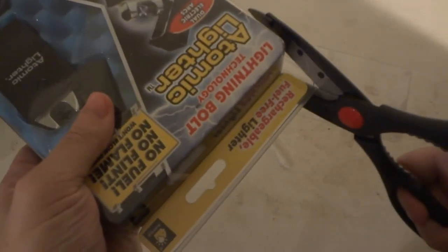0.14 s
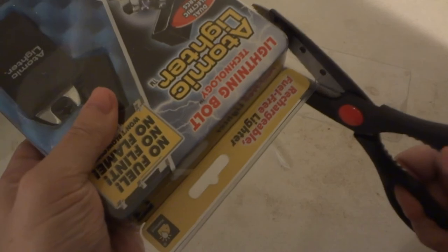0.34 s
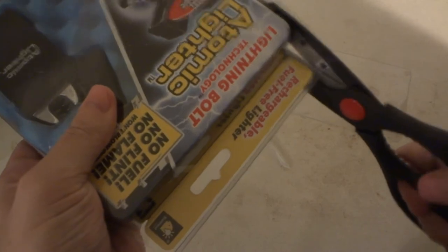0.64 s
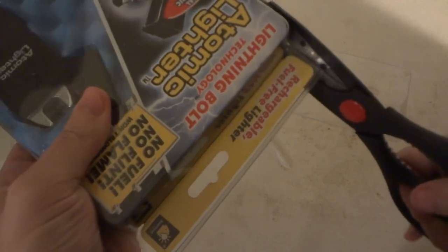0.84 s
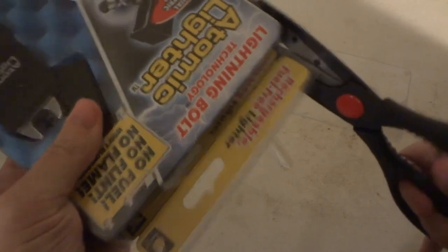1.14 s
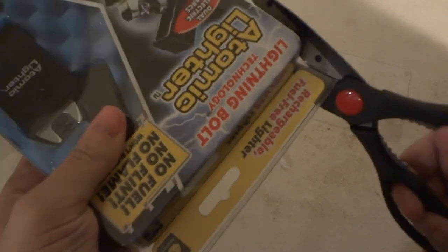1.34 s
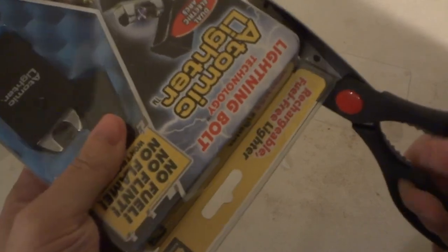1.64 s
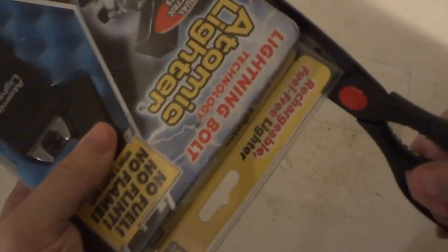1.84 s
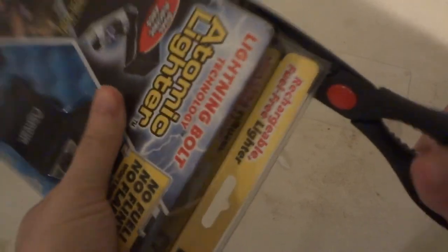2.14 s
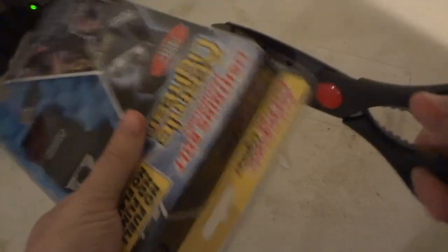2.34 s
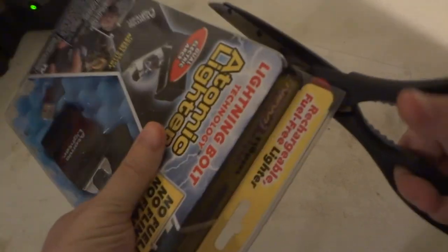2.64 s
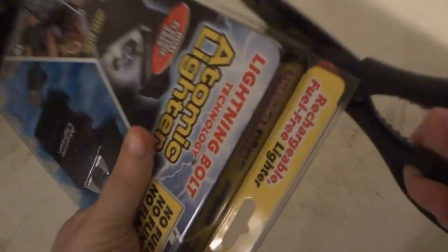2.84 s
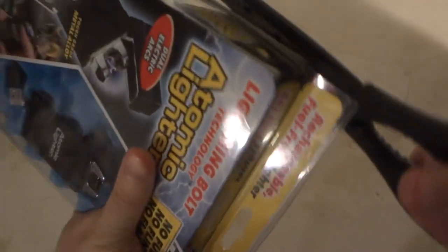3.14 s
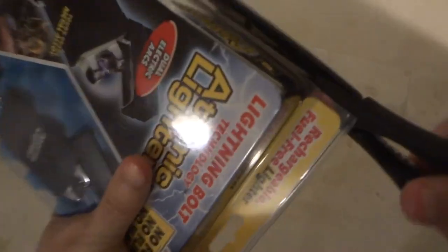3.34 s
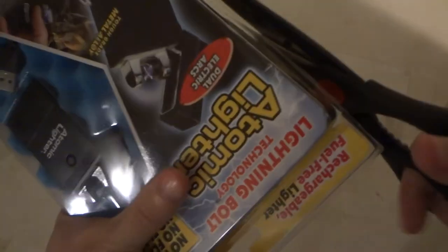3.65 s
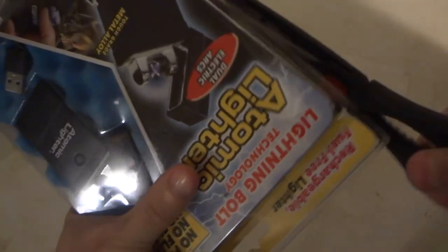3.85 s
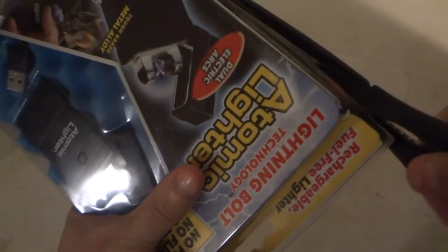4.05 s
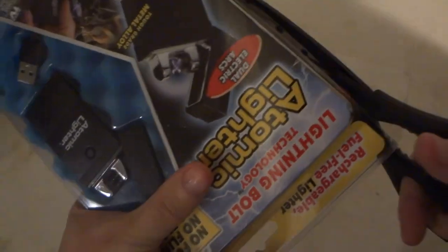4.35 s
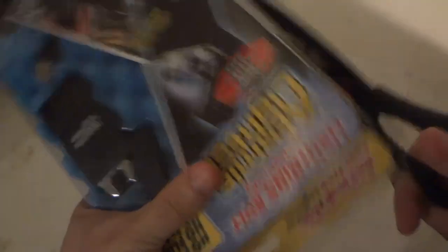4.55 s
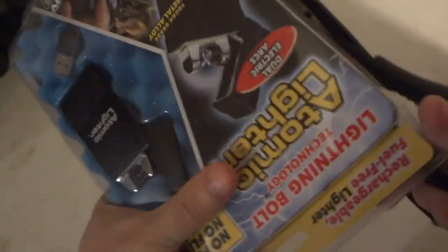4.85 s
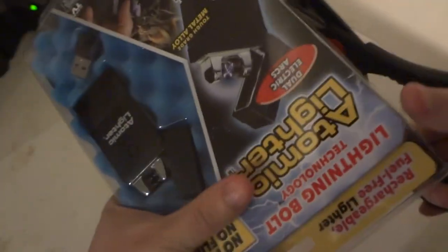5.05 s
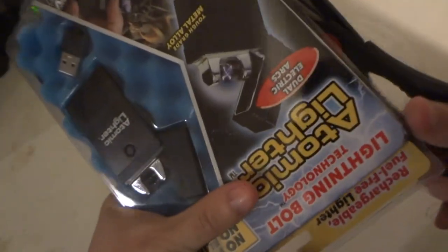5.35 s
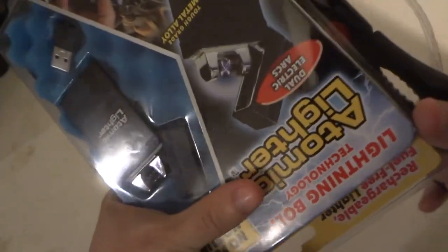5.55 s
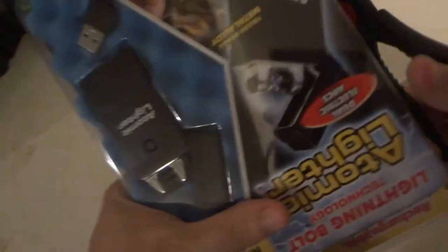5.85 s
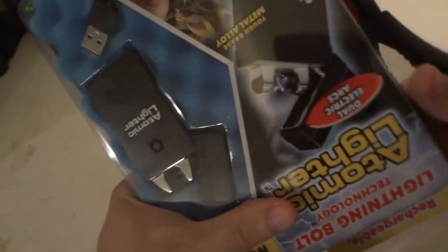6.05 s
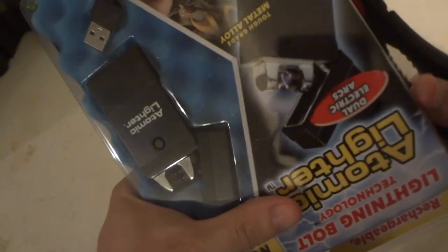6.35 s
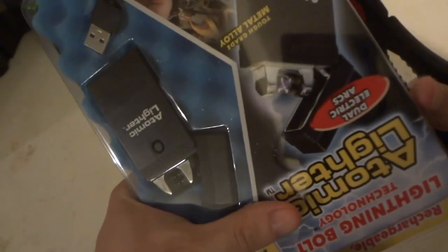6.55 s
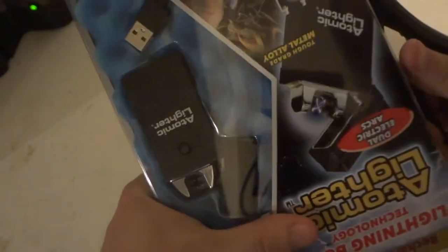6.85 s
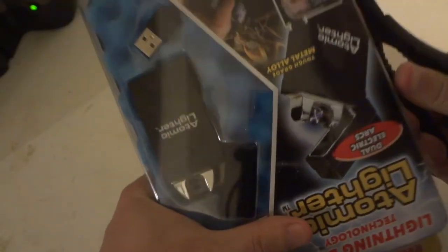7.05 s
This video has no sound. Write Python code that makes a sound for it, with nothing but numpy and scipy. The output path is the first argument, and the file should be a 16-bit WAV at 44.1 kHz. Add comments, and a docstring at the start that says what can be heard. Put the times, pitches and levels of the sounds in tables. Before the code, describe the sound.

Hard plastic shell creaks, pops and cracks as scissor blades bite through it in uneven bursts, growing busier, over faint indoor hiss.

```python
"""Scissors work on a stiff plastic blister pack over a desk, close to a camera in a small, softly hissing room.
First the shell snaps (a push on its hollow body, then creasing faces), the hand jolts it with dull thuds
and the edge ticks (noise bursts about a millisecond long); the first short strokes follow.
The steel blades then slide and knock (slips ringing metal modes), before the busiest cutting: stick-slip
strokes rasp at the edge and shake faces and shell, among more snaps, ticks and small ringing pops."""
import sys
import numpy as np
from scipy import signal
from scipy.fft import rfft, irfft
from scipy.io import wavfile
from scipy.ndimage import uniform_filter1d

SR = 44100
rng = np.random.default_rng(int(sys.argv[2]) if len(sys.argv) > 2 else 0)


def put_to_file(sound):
    """Save the sound as 16-bit audio at rate SR, in the file named by the first command-line argument."""
    columns = np.atleast_2d(sound).T  # one column per channel
    safe = np.clip(columns, -1, 1)
    whole_steps = np.round(safe * 32767)
    wavfile.write(sys.argv[1], SR, whole_steps.astype(np.int16))


N = 317079
TIME = np.arange(N) / SR
HIT = TIME[:SR // 6]  # time within one blow

# Blade strokes through the sheet: start_s, push_s, release_s, swell_db (negative sinks), rasp_db,
# faces_db, patch_hz, edge_hz, shell_db (hollow shell relative to the faces)
STROKES = [(1.143,0.056,0.12,20,-42,-46.5,870,4700,-5), (1.532,0.0051,0.11,2,-41,-80,820,5370,-10),
           (2.974,0.016,0.079,3,-53,-42.5,1130,5400,-17), (3.813,0.055,0.027,9.5,-37,-41.5,905,5400,-1),
           (3.904,0.016,0.045,10,-53.5,-34.5,920,3300,-18), (4.12,0.12,.25,-4.5,-68,-61,960,5000,5.5),
           (4.373,0.051,0.045,1.5,-31.5,-31,920,2920,-15.5), (4.542,0.021,0.084,0.5,-28,-37,1100,8900,-4.5),
           (4.575,0.018,0.059,-2,-28.5,-41.5,1220,6000,-2), (4.622,0.0096,0.17,9,-34,-28.5,1360,3000,-11),
           (4.666,0.03,0.061,30,-23,-34,900,5660,-12), (4.775,0.19,.05,0.5,-52.5,-65,833,7560,-3),
           (4.882,0.04,0.062,10,-31.5,-31.5,750,7600,-5), (5.179,0.034,0.18,15,-52,-60,1020,6950,-11),
           (5.360,0.0071,0.089,31,-34.5,-38.5,1210,6060,-4), (5.689,0.0093,0.068,6,-28,-30.5,1180,7200,-9),
           (5.730,0.049,0.21,15,-29,-27,990,8050,-7.5), (6.369,0.0019,0.05,2,-40,-24.5,1020,5000,-15),
           (6.580,0.085,0.19,25,-28.5,-28.5,880,5300,-8.5), (6.705,0.051,0.14,13,-52.5,-55,860,6100,4),
           (6.975,0.0027,0.15,-7,-47,-41.5,1040,8600,-4)]
# Modes of the air-filled shell: pitch_hz, level_db, t60_s
SHELL_MODES = [(275,-5.5,.048),(325,-3.5,.045),(383,0,.09),(462,0,.05),(560,-9,.04)]
# Modes of the flat faces of the pack: pitch_hz, level_db, t60_s
FACE_MODES = [(720,2,.022),(810,5.5,.028),(905,4,.032),(1045,1,.024),(1160,1,.026),(1240,0,.032),(1440,1.5,.013),(1680,0,.012),(2300,-1.5,.013)]


def undb(db):
    """Decibels to gain."""
    return 10 ** (np.asarray(db) / 20)


def unit(x):
    """Scale to rms 1."""
    return x / np.sqrt(np.mean(x ** 2))


def struck(x, db):
    """Set the rms level of the first 20 ms of a blow."""
    return x * undb(db) / np.sqrt(np.mean(x[:SR // 50] ** 2))


def add(track, s, x):
    """Mix x into the track at s seconds."""
    i = max(int(s * SR), 0)
    track[i:i + len(x)] += x[:N - i]


def through(x, response):
    """Pass a force through an impulse response."""
    return signal.fftconvolve(x, response)[:len(x)]


def colour(x, points):
    """Shape by a spectrum of (Hz, dB) points."""
    hz, db = np.transpose(points)
    f = np.fft.rfftfreq(len(x), 1 / SR)
    gain = undb(np.interp(np.log(f + 1), np.log(hz), db))
    return irfft(rfft(x) * gain, len(x))


def band(x, hz):
    """A broad resonance, an octave wide."""
    edges = np.minimum([hz / np.sqrt(2), hz * np.sqrt(2)], SR / 2 - 1)
    return signal.sosfilt(signal.butter(1, edges, "bandpass", fs=SR, output="sos"), x)


def thin(x, hz, order):
    """A small thin sheet radiates little below hz."""
    return signal.sosfilt(signal.butter(order, hz, "highpass", fs=SR, output="sos"), x)


def steady(x, span_s):
    """Even out the slow swings of a grain stream, keeping its grain."""
    power = uniform_filter1d(x ** 2, int(span_s * SR))
    return x / np.sqrt(np.maximum(power, 0) + 1e-12)


def ring(modes, scatter_db):
    """Damped modes; their weights scatter in dB with the point of contact."""
    hz, db, t60 = np.transpose(modes)[:, :, None]
    size = undb(db + scatter_db * rng.standard_normal(db.shape))
    decay = np.exp(-np.log(1000) * HIT / t60)
    return np.sum(size * np.sin(2 * np.pi * hz * HIT) * decay, axis=0)


def flexed(modes):
    """Bending the pack retunes each of its modes a little."""
    hz, db, t60 = np.transpose(modes)
    detune = 1 + .012 * rng.standard_normal(len(hz))
    return np.transpose([hz * detune, db, t60])


def slips(count, rate, spread_db):
    """Impulses at random moments, rate per second; a few stand out louder (softer for a negative spread)."""
    size = undb(spread_db * np.minimum(rng.exponential(size=count), np.pi))
    return (rng.random(count) < rate / SR) * size * rng.choice([-1, 1], count)


def tears(count, rate, spread_db):
    """Low, middle and high cracks of torn plastic, each register at its own random moments."""
    # Colour of rubbed and torn plastic: pitch_hz, level_db
    torn_colour = [(500,-45),(1200,9.5),(2000,1.5),(2700,0),(3500,4.5),(5300,2.5),(7000,0),(10500,1.5),(13000,10.5)]
    cracks = sum(band(slips(count, rate, spread_db), hz) for hz in (2600, 5200, 9500))
    return colour(cracks, torn_colour)


def pressure(t, push_s, release_s, swell_db):
    """The blade catches, changes by swell_db to full pressure over the push, then falls 60 dB in release_s."""
    attack_s, swell_power = 0.00017, 2.23  # the swell moves quickly, then levels off
    to_go = np.clip(1 - t / push_s, 0, 1)
    swell = undb(-swell_db * to_go ** swell_power)
    release = np.exp(-np.log(1000) * np.maximum(t - push_s, 0) / release_s)
    return (1 - np.exp(-t / attack_s)) * swell * release


def judder(t):
    """The blade sticks and slips: quick random swings of grip."""
    swings_per_s, depth_db = 166.3, 1.67
    swings = rng.standard_normal(256)
    return undb(depth_db * np.interp(t * swings_per_s, np.arange(len(swings)), swings))


def air():
    """Soft room rumble, alike on both sides, under a wider hiss."""
    # Spectrum of the still room: pitch_hz, density_db (relative, per Hz)
    air_spectrum = [(15, -35), (25, -18), (87, -1), (207, -7), (311, 3), (344, 3), (603, 0), (721, -5.5),
                    (907, -1.5), (1470, -5), (2510, -9), (4750, -12.5), (5820, -10.5), (6280, -13.5),
                    (11000, -15.5), (14300, -55), (22000, -120)]
    level_db = -61  # rms of the part alike on both sides
    mid, side = (colour(rng.standard_normal(N), air_spectrum) for _ in range(2))
    side = colour(side, [(60, -15.0), (400, -2.5), (1500, 3.5), (8000, -6.5)])
    return undb(level_db) * (mid + np.array([[1], [-1]]) * side) / np.std(mid)


def whistle():
    """Thin high tones flicker in the hiss, in short blips of uneven strength."""
    # Faint whistles: pitch_hz, level_db (highest possible peak)
    whistle_tones = [(5290,-64),(5750,-71),(6260,-66)]
    out = np.zeros(N)
    for hz, db in whistle_tones:
        cycle = TIME * 14.9 + rng.random()  # one blip per cycle, 14.9 a second
        strength = np.sqrt(rng.random(int(cycle[-1]) + 1))[cycle.astype(int)]
        blip = np.maximum(np.sin(2 * np.pi * cycle), 0) ** 2
        out += undb(db) * strength * blip * np.sin(2 * np.pi * hz * TIME)
    return out


def room(x):
    """The desk answers within milliseconds; the walls add a short tail, different on each side."""
    t = TIME[:SR // 2]
    desk = slips(len(t), rate=3000, spread_db=0) * (t > .002) * np.exp(-t / .005)
    desk = undb(-9.0) * desk / np.linalg.norm(desk)
    wall_colour = [(150, -14.0), (400, -17.0), (900, -8.0), (4000, -9.5), (11000, -12.5)]
    sides = []
    for _ in range(2):
        decay = (1 - np.exp(-t / 0.000058)) * np.exp(-np.log(1000) * t / 0.24)  # t60 0.24 s
        tail = rng.standard_normal(len(t)) * decay
        tail = colour(tail / np.linalg.norm(tail), wall_colour)
        sides.append(x + through(x, desk + tail))
    return np.array(sides)


def thuds():
    """The hand jolts the whole pack, which swings briefly on two low modes."""
    # Jolts of the hand: start_s, level_db
    jolts = [(0.649,-50.5),(1.821,-61),(1.94,-61),(3.926,-59),(4.578,-49),(5.531,-53.5),(6.371,-55)]
    # Modes of the pack in the hand: pitch_hz, level_db, t60_s
    thud_modes = [(82,-13.5,0.079),(131,0,0.07)]
    out = np.zeros(N)
    for s, db in jolts:
        add(out, s, struck(thin(ring(thud_modes, scatter_db=2.5), 49, order=2), db))
    return out


def blade(register_hz, focus_db):
    """Steel modes weaken by focus_db per octave away from the register that the contact favours."""
    # Modes of the steel blades: pitch_hz, level_db, t60_s
    steel_modes = [(1785,-3,.12),(1960,0,.085),(2490,0,.06),(2720,-3,.03),(3040,-4,.035),(3280,-4,.04),(3950,0,.022),(4620,0,.03)]
    hz, db, t60 = np.transpose(steel_modes)
    octaves_off = np.abs(np.log2(hz / register_hz))
    return ring(np.transpose([hz, db - focus_db * octaves_off, t60]), scatter_db=1)


def clacks():
    """The open blades meet, chatter for a moment and ring briefly."""
    # Knocks and catches of the blades: start_s, level_db, register_hz (favoured by the point of contact)
    knocks = [(2.373,-54,4600),(2.3858,-48.5,3860),(2.405,-44.5,4300),(2.8136,-44,4060),(2.8171,-39.5,1960),(3.524,-53.5,2390),(6.8913,-41.5,3040)]
    focus_db, contact_db = 24, -5  # fall per octave; bare contact noise relative to the steel
    out = np.zeros(N)
    for s, db, register_hz in knocks:
        bounces = slips(len(HIT), rate=4000, spread_db=0) * np.exp(-HIT / .003)
        chatter = 2 * (HIT == 0) + bounces
        steel = thin(through(chatter, blade(register_hz, focus_db)), register_hz / 2, order=2)
        contact = band(chatter, register_hz)
        add(out, s, struck(steel, db) + struck(contact, db + contact_db))
    return out


def scrapes():
    """Steel slides on steel: small slips keep the blades ringing and shake the pack between them."""
    # Slides of the blades: start_s, push_s, release_s, level_db, register_hz
    slides = [(2.338,0.075,0.21,-47.5,4170),(3.435,0.043,0.18,-41,2500)]
    swell_db, focus_db = 15, 11  # rise over the push; fall of the modes per octave
    grit_db, shell_db = 5, -3  # dry grit and the shaken pack, relative to the steel
    out = np.zeros(N)
    t = TIME[:SR // 2]
    for start, push_s, release_s, db, register_hz in slides:
        force = slips(len(t), rate=1500, spread_db=3)
        steel = unit(thin(through(force, blade(register_hz, focus_db)), register_hz / 2, order=2))
        grit = undb(grit_db) * unit(tears(len(t), rate=1600, spread_db=3.5))
        shell = undb(shell_db) * unit(through(force, ring(SHELL_MODES + FACE_MODES, scatter_db=1)))
        drag = judder(t) * pressure(t, push_s, release_s, swell_db)
        add(out, start, undb(db) * (steel + grit + shell) * drag)
    return out


def pop(hz):
    """A small patch flips: a brief chatter rings its modes; smaller patches sound higher and die sooner."""
    # Modes of a patch: ratio (to its pitch), level_db, decay_cycles (to fall 60 dB)
    patch_modes = [(.42,-11,26),(.9,-6,22),(1,0,30),(1.5,-8,16),(1.95,-11,12)]
    rub_share, rub_decay_s = 0.2, 0.0029  # rubbing that follows the first push
    ratio, db, cycles = np.transpose(patch_modes)
    modes = flexed(np.transpose([hz * ratio, db, cycles / hz]))
    rubbing = rub_share * rng.standard_normal(len(HIT)) * np.exp(-HIT / rub_decay_s)
    x = through((HIT == 0) + rubbing, ring(modes, scatter_db=1))
    return x / np.abs(x).max()


def pops():
    """Separate little knocks as small patches of the sheet pop under the blade."""
    # Popping patches: start_s, level_db (peak), pitch_hz
    popping_patches = [(2.661,-42,1010),(2.999,-33.5,810),(3.073,-29,1150),(3.863,-32.5,940),
                       (4.084,-40.5,914),(4.11,-36.5,1070),(4.6155,-22,1060),(4.6303,-21,1440),(4.728,-30.5,910),
                       (5.787,-16.5,1145),(5.828,-23.5,786),(5.876,-25.5,974),(6.233,-38,1065),
                       (6.534,-38.5,844),(6.624,-27.5,1470),(6.682,-22,874),(6.704,-26,848),(6.744,-33.5,1490),(6.9713,-21.5,1500)]
    out = np.zeros(N)
    for s, db, hz in popping_patches:
        add(out, s, undb(db) * pop(hz))
    return out


def tick(hz):
    """A crack about a millisecond long, then a faint fizz as it spreads through the sheet."""
    noise = colour(rng.standard_normal(len(HIT)), [(hz / 6, -18), (hz / 2, -7), (hz, 0), (hz * 2, -6)])
    crack = noise * np.exp(-HIT / 0.00089)
    fizz = undb(-27.5) * unit(noise) * np.exp(-HIT / 0.018)
    return crack / np.abs(crack).max() + fizz


def ticks():
    """The big cracks of the cut edge, as bursts of coloured noise."""
    # Edge cracks: start_s, level_db (peak of the crack), pitch_hz
    edge_cracks = [(0.795,-35,6140),(0.834,-15.5,6030),(1.1716,-29,5020),(1.2177,-16.5,3900),(1.543,-24.5,6100),(1.727,-14,5880),(1.769,-11.5,6430),
                   (1.864,-16,10100),(1.887,-19.5,8400),(1.94,-9.5,9000),(1.993,-24.5,9700),(2.041,-27,7100),
                   (3.013,-23.5,5550),(4.053,-31.5,8240),(4.080,-26.5,9000),(4.111,-27,3940),
                   (4.130,-27.5,9940),(4.239,-34,9780),(4.306,-34,5800),(4.3837,-14.5,4740),(4.392,-18,4500),(4.4166,-13,2870),(4.54,-11.5,9500),
                   (4.622,-17,4000),(4.6301,-9,5500),(4.672,-13.5,3500), (4.894,-16,4740),
                   (4.9168,-9,8750),(4.971,-24.5,4500),
                   (5.105,-34,8150),(5.131,-32,7600),(5.325,-33.5,4940),(5.367,-14.5,5700),(5.407,-17.5,8400),(5.42,-16,9000),
                   (5.551,-11,5700),(5.703,-11.5,7150),(5.714,-15,7700),(5.767,-12,4860),(5.798,-6,7040),(6.575,-19,10700),
                   (6.781,-23.5,6500),(6.892,-21.5,2830),(6.945,-11.5,7140),(6.954,-20,6770),(6.9715,-11.5,2850),(7.014,-21.5,7560)]
    out = np.zeros(N)
    for s, db, hz in edge_cracks:
        add(out, s, undb(db) * tick(hz))
    return out


def splits():
    """Stray cracks, pops and patch knocks at random moments of a push, stronger when the blade bites harder."""
    splits_per_s, knock_db = 30, -7  # average rate in a push; knock on the patch under the blade
    level_db, follow = -20, 0.78  # level at a rasp of 0 dB; dB per dB of rasp
    out = np.zeros(N)
    for start, push_s, _, _, rasp_db, _, patch_hz, edge_hz, _ in STROKES:
        chances = rng.random((8, 4))
        for when, odds, size, place in chances:
            crack = tick(edge_hz) + pop(edge_hz * (.5 + .5 * place))
            knock = ring([(patch_hz * (0.85 + .5 * place), 0, .025)], scatter_db=2.5)
            split = crack + undb(knock_db) * knock
            happens = odds < splits_per_s * push_s / len(chances)
            gain = happens * size * undb(level_db + follow * rasp_db)
            add(out, start + when * push_s, gain * split)
    return out


def held(s):
    """The modes of the shell as the hand damps them at s seconds."""
    # Hold of the hand: time_s, ring_share (of the free ring time), tilt_db (per octave)
    hand_hold = [(1.9,0.99,-16),(3.099,0.79,-6),(6.3,1.32,0.5)]
    times, shares, tilts = np.transpose(hand_hold)
    hz, db, t60 = np.transpose(flexed(SHELL_MODES))
    tilt_db = np.interp(s, times, tilts) * np.log2(hz / hz[0])
    return np.transpose([hz, db + tilt_db, t60 * np.interp(s, times, shares)])


def snaps():
    """A patch of the shell flips: one push on the hollow body, then a short run of creases."""
    # Buckling snaps: start_s, faces_db, body_db (hollow body), patch_hz (buckling patch)
    buckles = [(0.646,-37,-46,790),(0.653,-38,-40.5,960),(0.833,-40.5,-41,660),(1.177,-46.5,-64,890),(1.218,-46.5,-47.5,950),(1.569,-37,-52,800),
               (1.716,-42,-39,900),(1.818,-37.5,-32.5,930),(1.937,-39,-31.5,795),(2.676,-65,-48.5,710),(2.817,-49,-49,940),
               (2.975,-44.5,-43,805),(3.071,-38,-36.5,970),(3.096,-41.5,-65,810),(3.119,-34.5,-31,1060),(3.14,-41,-45,805),
               (3.206,-36,-32,1790),(3.230,-39.5,-53,820),(3.819,-46,-44,720),(3.928,-26.5,-27,887),(4.175,-48,-54,2140),
               (4.206,-49.5,-46,860),(4.579,-33,-40,1280),(4.631,-30,-40,1310),(4.928,-68,-40,910),(5.361,-43.5,-38.5,910),
               (5.408,-38.5,-33.5,875),(5.474,-33.5,-28.5,895),(5.533,-24.5,-26.5,684),(5.803,-30.5,-32.5,835),(5.817,-48,-38,1110),
               (5.995,-58,-48.5,880),(6.3271,-28.5,-29.5,1370),(6.373,-26.5,-27.5,940),(6.778,-45.5,-50,890),
               (6.894,-41.5,-40.5,956),(6.971,-31.5,-44.5,670)]
    flip_size, flip_s = 2, .002  # the sharp flip: size of its impulse, delay after the push
    crackle_db = -2  # relative to the gain of the faces
    out = np.zeros(N)
    push = np.exp(-HIT / 0.00053)
    creasing = (1 - np.exp(-HIT / 0.0001)) * np.exp(-HIT / 0.012)
    flip = flip_size * (HIT == HIT[int(flip_s * SR)])
    for s, faces_db, body_db, patch_hz in buckles:
        body = through(push, np.gradient(ring(held(s), scatter_db=1.5)))
        creases = slips(len(HIT), rate=3000, spread_db=0.5) * creasing + flip
        panel = through(creases, ring(flexed(FACE_MODES), scatter_db=4.0))
        patch_modes = [(patch_hz, 0, .026), (patch_hz * 1.13, -2, .02)]
        patch = through(creases, ring(patch_modes, scatter_db=2.5))
        faces = thin(struck(panel, db=-4.5) + struck(patch, db=-7.0), 583, order=2)
        # the creases crackle over the same short span
        crackle = struck(tears(len(HIT), rate=3000, spread_db=1.5) * creasing, crackle_db)
        add(out, s, struck(body, body_db) + undb(faces_db) * (faces + crackle))
    return out


def strokes():
    """The blade drags through the sheet: slips shake the faces and the shell while tears rasp at the edge."""
    faces_lag_s = 0.011  # the faces keep shaking after the edge has parted
    out = np.zeros(N)
    t = TIME[:SR // 2]
    lead = len(HIT)  # run-in, cut off once the modes are ringing
    count = len(t) + lead
    for start, push_s, release_s, swell_db, rasp_db, faces_db, patch_hz, edge_hz, shell_db in STROKES:
        # a light stroke gives separate crackles, a hard one a dense crunch
        rate = 1400 * undb(.5 * (rasp_db + 30.5))
        force = slips(count, 2 * rate, spread_db=5.5)
        responses = (ring(flexed(FACE_MODES), scatter_db=2.5),
                     ring([(patch_hz, 0, .018)], scatter_db=0),
                     np.gradient(ring(SHELL_MODES, scatter_db=2.5)))
        panel, patch, body = (steady(through(force, r), span_s=0.082)[lead:] for r in responses)
        rasp = tears(count, rate, spread_db=-0.5)
        rasp = rasp + 0.54 * band(band(rasp, edge_hz), edge_hz)
        rasp = steady(rasp, span_s=0.0045)[lead:]
        shaken = thin(0.47 * panel + 0.39 * patch, 640, order=2) + undb(shell_db) * body
        edge = undb(rasp_db) * rasp * pressure(t, push_s, release_s, swell_db)
        faces = undb(faces_db) * shaken * pressure(t, push_s + faces_lag_s, release_s, swell_db)
        add(out, start, judder(t) * (edge + faces))
    return out


def scene():
    """Pack and blades are heard close by in the room, leaning a little to the left."""
    pack = snaps() + ticks() + pops() + splits() + strokes() + scrapes() + clacks()
    near = room(thin(pack, 284, order=3) + thuds())
    lean = colour(near.mean(axis=0), [(100, -25), (300, -29), (550, -12.0), (1200, -19), (8000, -36)])
    return near + np.array([[1], [-1]]) * lean + air() + whistle()


def record(dry):
    """The camera cuts the top octave, above 11 kHz, with a steep low-pass."""
    return signal.sosfilt(signal.ellip(10, .2, 70, 11000, fs=SR, output="sos"), dry)


dry = scene()
out = record(dry)
put_to_file(out)
```